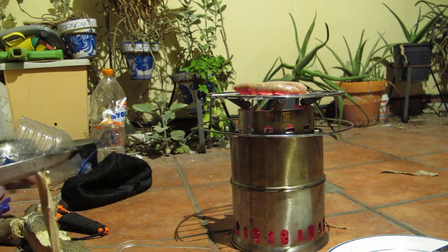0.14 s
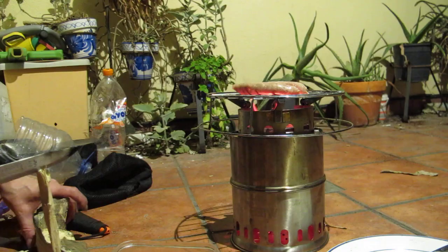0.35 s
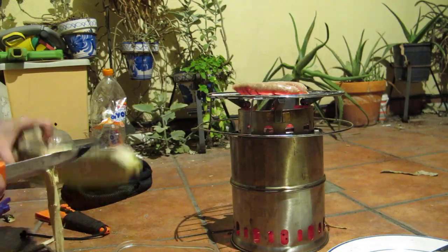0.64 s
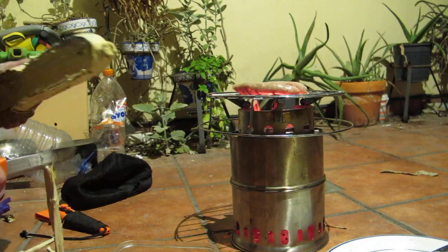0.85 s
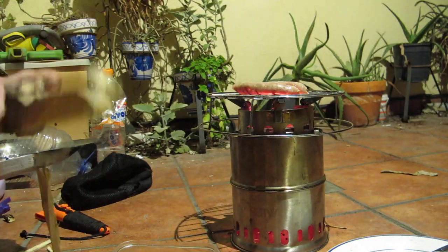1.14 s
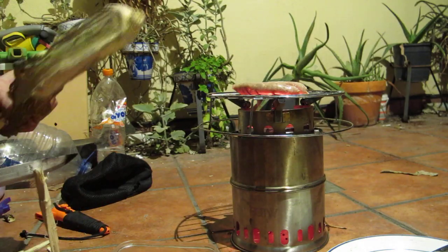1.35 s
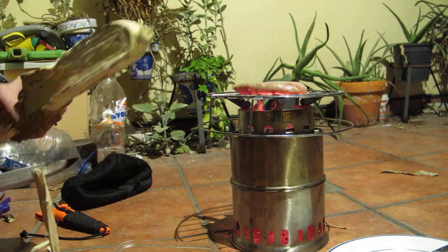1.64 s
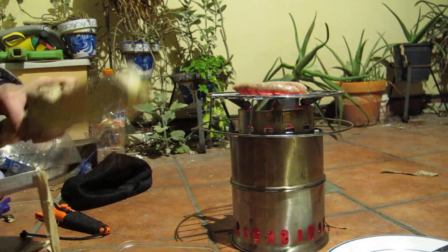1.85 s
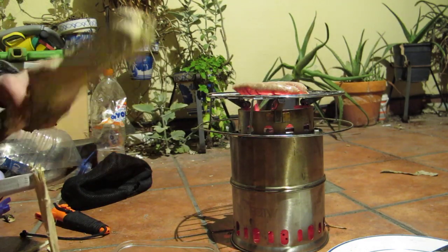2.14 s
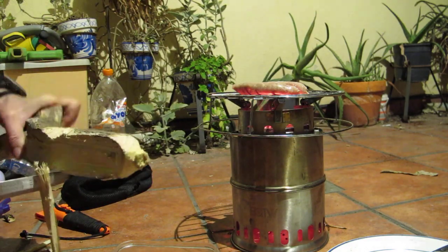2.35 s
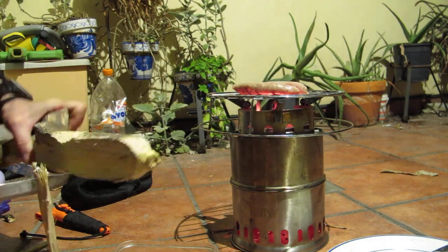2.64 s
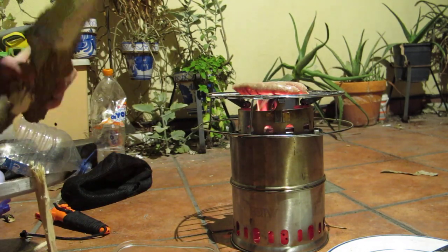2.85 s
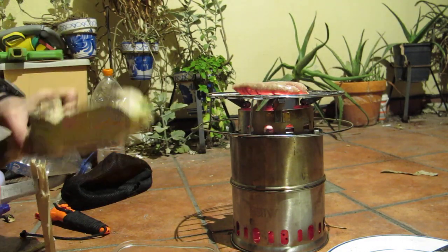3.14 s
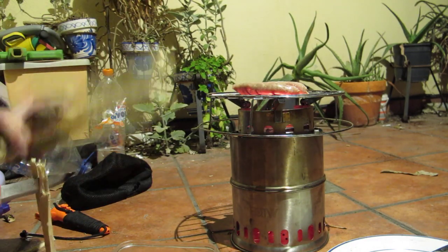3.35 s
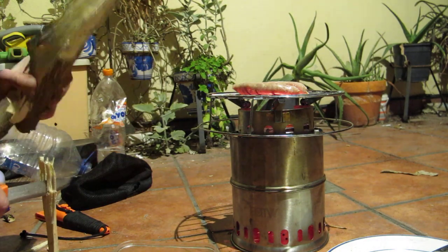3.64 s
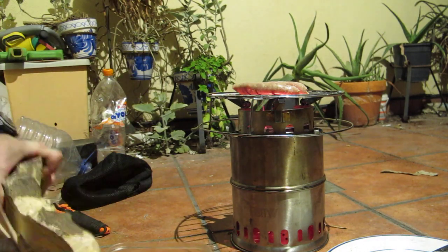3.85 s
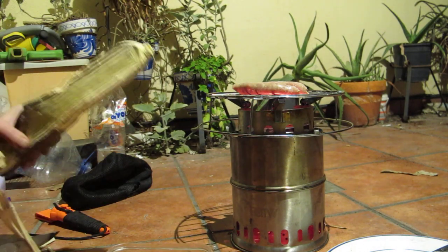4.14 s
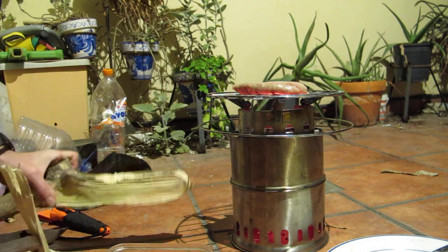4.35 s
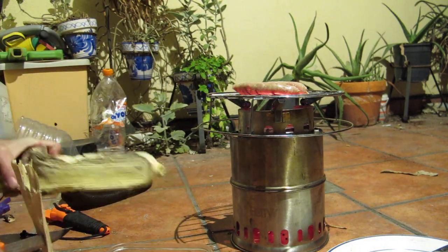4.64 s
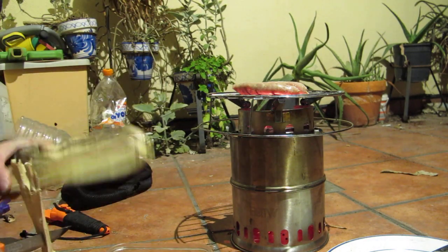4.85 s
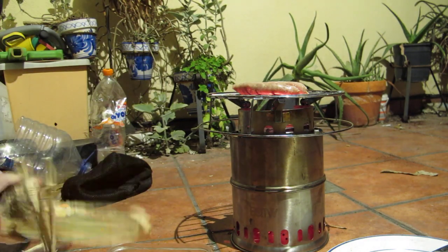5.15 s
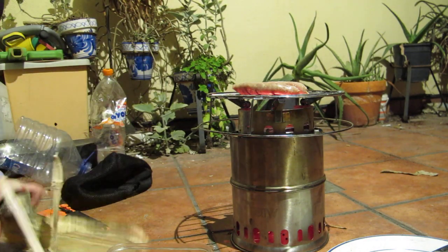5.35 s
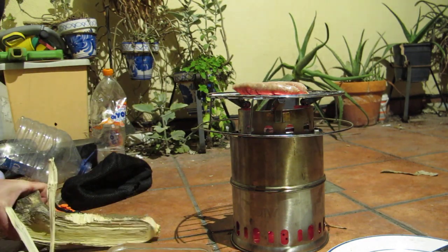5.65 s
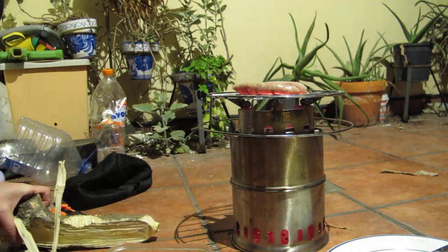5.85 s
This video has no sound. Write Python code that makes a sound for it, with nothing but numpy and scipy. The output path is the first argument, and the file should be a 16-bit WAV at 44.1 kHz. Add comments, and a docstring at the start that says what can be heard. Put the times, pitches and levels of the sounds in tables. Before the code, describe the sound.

On a small walled patio, hands rustle bark and a loose blade clinks. Two sharp blows bite the blade into wood, then a run of heavy, low thuds as the log is pounded on tiles. It splits in a rapid crackling burst, followed by one more bite and loose pieces clacking. Close stereo microphone, short hard echoes, quiet town rumble, level ducking after loud hits.

```python
"""Heavy thuds, blade clinks and a splitting crack: a log with a wedged knife is pounded on patio tiles.
Contacts are short noise bursts with a clatter; most also set decaying modes of blade or wood ringing.
Loose pieces clack; hands rustle and scrape (swelling noise bands) over a quiet town rumble.
Direct sound, one wall echo and a dense patio tail meet.
A gain control ducks after loud blows and creeps back."""
import sys
import numpy as np
from scipy import signal
from scipy.fft import rfft, irfft, next_fast_len
from scipy.io import wavfile
from scipy.ndimage import uniform_filter1d

SR = 44100
rng = np.random.default_rng(int(sys.argv[2]) if len(sys.argv) > 2 else 0)


def log_audio(samples):
    """Write samples as a 16-bit WAV file to the path given in sys.argv[1]."""
    # one column per channel
    frames = np.atleast_2d(samples).T
    # limit to full scale, then quantise
    limited = np.clip(frames, -1, 1)
    pcm = np.round(limited * 32767).astype(np.int16)
    wavfile.write(sys.argv[1], SR, pcm)


N = 264159
CONTACT_SAMPLES = 9000
FLUTTER_HZ = 60
LOOSE, RESTING = .6, .3   # share of a ring that flutters
# stereo likeness of background noise: (frequency [Hz], left-right correlation)
LIKENESS = [(60, 0.93), (240, 0.9), (950, 1), (3770, 0.022), (15000, 0.06)]
# modes of the blade held in wood: (frequency [Hz], level [dB], t60 [s])
WEDGED_BLADE = [(1463, -6, 0.29), (2384, -5.5, 0.24), (2065, -11, 0.13), (3180, -13, 0.2), (4870, -7, 0.17)]


def from_db(db):
    """Amplitude ratio of a level in dB."""
    return 10 ** (np.asarray(db) / 20)


def rms_one(x):
    """Scale to unit rms."""
    return x / np.sqrt(np.mean(x ** 2) + 1e-20)


def at_hz(points, hz):
    """Interpolate (Hz, value) points over log frequency."""
    points = np.array(points)
    return np.interp(np.log(hz), np.log(points[:, 0]), points[:, 1])


def band(x, low_hz, high_hz):
    """Band-pass x."""
    sos = signal.butter(2, [low_hz, high_hz], "band", fs=SR, output="sos")
    return signal.sosfilt(sos, x + 1e-18)


def around(x, hz, width):
    """Band-pass x in a narrow band around hz."""
    return band(x, hz / (1 + width), hz * (1 + width))


def drift(corner_hz):
    """Slow random wander of unit rms: noise through a double pole, on every 40th sample."""
    r = np.exp(-80 * np.pi * corner_hz / SR)
    white = rng.standard_normal(N // 40 + 2002)
    slow = signal.lfilter([1], [1, -2 * r, r * r], white)[2000:]   # settled part
    return np.interp(np.arange(N) / 40, np.arange(len(slow)), rms_one(slow))


def ring(push, hz, t60_s):
    """Two-pole resonator: a unit click starts a decaying sine of height about 1."""
    r = from_db(-60 / (t60_s * SR))
    w = 2 * np.pi * hz / SR
    return signal.lfilter([0, np.sin(w)], [1, -2 * r * np.cos(w), r * r], push + 1e-18)


def stereo_bands(size, likeness, gain):
    """Half-octave bands of stereo noise, each shaped by gain(hz) and correlated by likeness."""
    out = 0
    edges_hz = 22 * 2 ** np.arange(0, 9.9, .5)
    white = rng.standard_normal((2, 2, size))   # neighbouring bands take different noise
    for k, (low_hz, high_hz) in enumerate(zip(edges_hz, edges_hz[1:])):
        mid, side = band(white[k % 2], low_hz, high_hz)
        hz = np.sqrt(low_hz * high_hz)
        alike = np.clip(at_hz(likeness, hz), -1, 1)
        pair = np.sqrt(1 + alike) * mid + np.sqrt(1 - alike) * side * [[1], [-1]]
        out = out + gain(hz) * pair
    return out


def rub_swell(middle_s, half_s, edge_db=-12.5):
    """A rub swells to its middle and fades again, edge_db down half_s away."""
    return from_db(edge_db * ((np.arange(N) / SR - middle_s) / half_s) ** 2)


def hand_level(idle_db, column):
    """Power sum of an idle level and the swells of one level column of the hand rubs."""
    # hands on bark: (middle [s], half length [s], dull shuffle [dB], low scuff [dB], high rustle [dB])
    hand_rubs = [(0.01, 0.092, -41, -37.5, -37), (0.269, 0.071, -36, -28.5, -31),
                 (0.42, 0.075, -38.5, -57, -61), (0.46, 1, -45, -43, -34), (0.629, 0.17, -48, -33.5, -26),
                 (1.14, 0.29, -45, -39, -61.5), (2.194, 0.22, -47, -51, -42.5),
                 (3.755, .06, -46, -33.5, -48.5), (4.465, 0.037, -73, -49, -43),
                 (4.85, 0.075, -45, -49.5, -70), (5.22, 0.033, -61.5, -56.5, -28.5),
                 (5.724, 0.076, -64, -56, -31.5), (5.859, 0.08, -60.5, -63, -37)]
    level = from_db(idle_db)
    for rub in hand_rubs:
        level = np.hypot(level, from_db(rub[column]) * rub_swell(rub[0], rub[1]))
    return level


def rumble():
    """Far town rumble and microphone hiss: slowly gusting noise, swelled by dull shuffling nearby."""
    # spectrum: (frequency [Hz], density [dB per Hz])
    rumble_spectrum = [(20, -13), (50, 0), (115, 3), (300, -9), (510, -10), (900, -19), (1200, -18.5),
                       (3000, -27), (6000, -31.5), (15800, -37.5)]
    gust_db = 1.0 * drift(5.9)
    noise = stereo_bands(N, LIKENESS, lambda hz: from_db(at_hz(rumble_spectrum, hz) + gust_db))
    return hand_level(idle_db=-51, column=2) * rms_one(noise)


def hands():
    """Hands rub bark: low scuff and high rustle noise that wavers jointly and per band."""
    # spectrum: (frequency [Hz], density [dB per Hz])
    rustle_spectrum = [(150, 1.5), (260, -1.5), (700, 0.5), (1200, -4), (2190, -10), (2980, -9), (5810, -7),
                       (9000, -17.5), (15000, -37.5)]
    scuff = hand_level(idle_db=-62, column=3)
    rustle = hand_level(idle_db=-47, column=4)
    rub_db = 2 * drift(8.3)

    def gain(hz):
        level = scuff if hz < 1500 else rustle
        return level * from_db(at_hz(rustle_spectrum, hz) - 3.0 + rub_db + 0.64 * drift(9.2))

    return stereo_bands(N, LIKENESS, gain)


def scrapes(width=0.054, grain_db=0.0, alike=0.86):
    """Faint pitched scrapes and squeaks: noise in one narrow resonance each."""
    # (middle [s], half length [s], frequency [Hz], level [dB])
    scrape_events = [(0.034, 0.07, 510, -45.5), (0.265, 0.034, 251.4, -36), (0.268, 0.019, 1284, -32),
                     (0.725, 0.098, 2090, -50.5), (1.143, 0.04, 1680, -51), (3.763, 0.03, 712, -46.5),
                     (3.751, 0.063, 1580, -52.5)]
    mid, side = rng.standard_normal((2, N)) * from_db(grain_db * drift(30.0))
    noise = mid + (1 - alike) * side * np.array([[1], [-1]])
    out = 0
    for middle_s, half_s, hz, level_db in scrape_events:
        squeak = rms_one(around(noise, hz, width))
        out = out + from_db(level_db) * rub_swell(middle_s, half_s) * squeak
    return out


def struck(kind, s, crack_db, note_hz, weight_db=0, bright_db=0, pan_db=0):
    """Colour of a kind of contact, shifted by strength, weight and brightness of one blow."""
    # kind: thud, knock, splinter [dB re crack], clatter [dB re loudest part], pan [dB L-R],
    # contact time [ms], echo strength [dB]
    thud_db, knock_db, splinter_db, clatter_db, side_db, contact_ms, wet_db = kind
    return (s, crack_db, crack_db + thud_db + weight_db,
            crack_db + knock_db + 0.54 * weight_db,   # the knock follows weight in part
            crack_db + splinter_db + bright_db,
            note_hz, clatter_db, side_db + pan_db, contact_ms, wet_db)


def contact(row, lead_ms=1.3, clatter_ms=10.0, clatter_width=0.078):
    """One blow: a four-part burst of a few ms, then the rough clatter of the struck spot."""
    # bands of crack, thud, knock, splinter: (low edge [Hz], high edge [Hz])
    parts_hz = [(1430, 4590), (97, 354), (500, 1300), (5040, 8320)]
    s, *parts_db, note_hz, clatter_db, pan_db, contact_ms, wet_db = row
    t_ms = np.arange(CONTACT_SAMPLES) / SR * 1000
    fade = np.exp(-t_ms / np.clip(contact_ms, .3, 8)) * np.minimum(t_ms / 0.26, 1)
    grit = rng.standard_normal((5, CONTACT_SAMPLES))
    clatter = around(grit[4] * np.exp(-t_ms / clatter_ms), note_hz, clatter_width)
    grit *= fade
    grit[1] = fade * np.sin(np.minimum(t_ms / 2.1, 2) * np.pi)   # thud: one push and rebound
    heard = [band(g, low, high) for g, (low, high) in zip(grit, parts_hz)] + [clatter]
    levels = from_db(parts_db + [max(parts_db) + clatter_db])
    parts = [level * h / np.abs(h).max() for level, h in zip(levels, heard)]
    crack, thud, knock, splinter, clatter = parts
    sides = from_db(np.array([[.5], [-.5]]) * pan_db)   # lows arrive centred
    direct = thud + knock + sides * (crack + splinter + clatter)

    # walls and modes get an even click of the same colour and energy
    click = t_ms == 0
    even = 0
    for sign, (low, high), part in zip([1, 1, -1, -1], parts_hz, parts):   # neighbours meet in phase
        even = even + sign * rms_one(band(click, low, high)) * np.std(part)
    # modes near the struck spot ring most
    spot = rms_one(around(click, note_hz, clatter_width)) * np.std(clatter)
    sent = from_db(wet_db) * np.array([even + clatter, even + spot])
    return round((s + lead_ms / 1000) * SR), np.vstack([direct, sent])


def blows(events, modes=(), ring_db=0, flutter=0):
    """Rows left, right, all-round and push; the push rings the modes, a looser body flutters more."""
    out = np.zeros((4, N + CONTACT_SAMPLES + 100))
    for at, sound in map(contact, events):
        out[:, at:at + CONTACT_SAMPLES] += sound
    out = out[:, :N]
    push = out[3].copy()
    for hz, level_db, t60_s in modes:
        wobble = 1 - flutter + flutter * drift(FLUTTER_HZ)
        out += from_db(level_db + ring_db) * hz / SR * ring(push, hz, t60_s) * wobble
    return out


def ticks():
    """Small ticks of fingers and chips, and faint pitched pings: contacts without modes."""
    # kinds of contact: columns as in struck()
    tick_kind = (-18, -17, -2.5, -17.5, 4, 4, 5.5)
    ping_kind = (-23.5, -20.5, -6.5, 2.5, -1, 5, -11.5)
    # ticks: (time [s], crack [dB], brightness [dB], pan [dB L-R])
    tick_events = [(0.307, -47, 17.5, 10), (0.328, -27, 4.5, -3), (0.478, -25.5, 1, -1),
                   (0.5348, -42.5, 18, 1), (0.574, -35.5, 18.5, 4), (1.344, -25, -15.5, -9),
                   (1.4455, -49.5, 17, -1), (2.8808, -32, 11, -8.5), (3.3713, -40, 2.5, -16),
                   (5.249, -45, 20.5, 12), (5.262, -54, 18.5, 2)]
    # pings: (time [s], crack [dB], clatter [Hz])
    ping_events = [(2.134, -35.5, 3850), (2.197, -44, 2140), (2.489, -41, 2480)]
    events = [struck(tick_kind, s, db, 6018, bright_db=bright_db, pan_db=pan_db)
              for s, db, bright_db, pan_db in tick_events]
    events += [struck(ping_kind, s, db, hz) for s, db, hz in ping_events]
    return blows(events)


def clacks():
    """Split pieces knocked about: heavy, knocking contacts ring short wood modes."""
    # kind of contact: columns as in struck()
    clack_kind = (-1.5, 7.5, 3.5, -9, -3, 1.5, 6)
    # (time [s], crack [dB], weight [dB], brightness [dB], clatter [Hz])
    clack_events = [(5.184, -23, -1.5, 1, 786), (5.2421, -46.5, 14, 0, 1240), (5.4045, 2, -7, -12.5, 1382),
                    (5.6412, -42, 22, -12, 580), (5.8404, -38.5, 18, -2.5, 1430),
                    (5.8701, -51.5, 28.5, -8.5, 539)]
    # modes of the pieces: (frequency [Hz], level [dB], t60 [s])
    piece_modes = [(326.5, 4.5, 0.088), (525, -9.5, 0.39), (767, -2, 0.16), (1210, -8, 0.14),
                   (1430, -2.5, 0.24), (2330, -5.5, 0.085)]
    events = [struck(clack_kind, s, db, hz, weight_db, bright_db)
              for s, db, weight_db, bright_db, hz in clack_events]
    return blows(events, piece_modes, ring_db=-9.5, flutter=RESTING)


def clinks():
    """The loose blade clinks: its modes ring with a strong flutter."""
    # kind of contact: columns as in struck()
    clink_kind = (-20.5, -16, -16, -7, -3, 2.5, 6.5)
    # (time [s], crack [dB], clatter [Hz])
    clink_events = [(0.3407, -9.5, 1835), (0.4445, -19, 1830)]
    # modes of the loose blade: (frequency [Hz], level [dB], t60 [s])
    loose_blade = [(930, -7.5, 0.39), (1660, -13, 0.13), (1900, -1.5, 0.06), (2018, 4, 0.13),
                   (2880, -1.5, 0.077)]
    events = [struck(clink_kind, s, db, hz) for s, db, hz in clink_events]
    return blows(events, loose_blade, ring_db=-8.5, flutter=LOOSE)


def bites():
    """The blade bites into wood: a strong crack rings the wedged blade."""
    # kind of contact: columns as in struck()
    bite_kind = (-25.5, -18, -16, -19.5, 1.5, 2, 0)
    # (time [s], crack [dB], weight [dB], brightness [dB], clatter [Hz])
    bite_events = [(1.2011, 10, -3.5, -7.5, 1990), (1.497, 5, 3, 6.5, 4560), (3.8045, 8, 12.5, 1.5, 2360),
                   (4.94, -1.5, 7, -18.5, 2480)]
    events = [struck(bite_kind, s, db, hz, weight_db, bright_db)
              for s, db, weight_db, bright_db, hz in bite_events]
    return blows(events, WEDGED_BLADE, ring_db=-20.5, flutter=LOOSE)


def splits():
    """The log cracks apart: a quick run of contacts rings the two halves."""
    # kind of contact: columns as in struck()
    split_kind = (-24, -2.5, -10, -8.5, 2.5, 3.5, 4.5)
    # (time [s], crack [dB], weight [dB], brightness [dB], clatter [Hz])
    split_events = [(3.819, -2.5, -11.5, 12.5, 903), (3.8283, 12.5, 2.5, 6, 990),
                    (3.837, 0, 12, -3.5, 1259), (3.854, 2.5, 9.5, -2.5, 938), (3.875, 5, 8.5, 3.5, 817),
                    (3.911, 0.5, 3.5, -0.5, 948), (3.921, -5.5, 2.5, 6, 1098)]
    # modes of the halves: (frequency [Hz], level [dB], t60 [s])
    half_modes = [(756, -22, 0.69), (981, 1, 0.14), (1027.2, -27.5, 1), (1200, -6, 0.1), (1416, -6, 0.18),
                  (1710, -11.5, 0.043), (2250, -15, 0.16)]
    events = [struck(split_kind, s, db, hz, weight_db, bright_db)
              for s, db, weight_db, bright_db, hz in split_events]
    return blows(events, half_modes, ring_db=-10.5, flutter=LOOSE)


def pounds():
    """Log on tiles: heavy contacts ring the log's low modes, and faintly the blade wedged in it."""
    # kind of contact: columns as in struck()
    pound_kind = (-5.5, -3, -2, -15.5, -0.5, 2.5, 2)
    # (time [s], crack [dB], weight [dB], brightness [dB])
    pound_events = [(1.7613, -12.5, 0.5, -4), (1.773, -23.5, -1, 5), (2.0207, -3.5, 0.5, 1),
                    (2.03, -13.5, 6, -2), (2.058, -24.5, 0, -5), (2.3185, 1, 0, -0.5), (2.63, -1, 5, 9.5),
                    (3.038, 1.5, -2.5, 6), (3.05, -14.5, 6.5, -1), (3.067, -19, 10, -10),
                    (3.4135, 4, -2, -2)]
    # modes of the log: (frequency [Hz], level [dB], t60 [s])
    log_modes = [(67.5, 9, 0.54), (163.4, 7, 0.17), (264, -6.5, 0.19), (347, 2, 0.076), (533, -0.5, 0.06),
                 (596, -2.5, 0.14)]
    shaken_blade = [(hz, db - 22.5, t60_s) for hz, db, t60_s in WEDGED_BLADE]
    events = [struck(pound_kind, s, db, 2250, weight_db, bright_db)
              for s, db, weight_db, bright_db in pound_events]
    return blows(events, log_modes + shaken_blade, ring_db=-2.0, flutter=RESTING)


def ports(x):
    """The housing shades and delays direct sound differently at the two microphone ports."""
    # (frequency [Hz], left lead [rad])
    port_phase = [(3000, .1), (8000, -1.3), (10000, 1.0), (13000, 1.3)]
    # (frequency [Hz], left-right balance [dB])
    port_balance = [(1000, 1), (5000, 9.5), (9500, -11.5), (15000, -0.5)]
    size = next_fast_len(N)
    hz = np.maximum(np.arange(size // 2 + 1) * SR / size, 1)
    half = from_db(at_hz(port_balance, hz) / 2) * np.exp(.5j * at_hz(port_phase, hz))
    return irfft(rfft(x, size) * [half, 1 / half], size)[:, :N]


def wall_echo(direct, lag_ms=13, echo_db=-22):
    """The wall behind the plants returns the direct sound once, sides swapped."""
    lag = round(lag_ms / 1000 * SR)
    out = direct.copy()
    out[:, lag:] += from_db(echo_db) * direct[::-1, :-lag]
    return out


def patio(x, first_ms=5.7, build_ms=2.0, far_db=-27.0, far_stretch=3.72):
    """Walls and tiles answer with a dense tail, longest in the lows; far walls add a faint longer one."""
    # decay: (frequency [Hz], t60 [s])
    patio_t60 = [(80, 0.37), (250, 0.25), (700, 0.16), (2000, 0.2), (5000, 0.15), (12000, 0.21)]
    # (frequency [Hz], left-right correlation)
    patio_likeness = [(100, 0.99), (600, 0.95), (2000, 0.25), (8000, 0.6)]
    t = np.arange(SR * 3 // 4) / SR

    def decay(hz):
        fall_db = -60 * t / at_hz(patio_t60, hz)
        return from_db(fall_db) + from_db(far_db + fall_db / far_stretch)

    tail = stereo_bands(len(t), patio_likeness, decay)
    tail *= np.clip((t * 1000 - first_ms) / build_ms, 0, 1)
    tail /= np.sqrt(np.sum(tail ** 2) / 2)
    return signal.fftconvolve(x.mean(axis=0)[None], tail, axes=1)[:, :N]


def gain_control(x, limit_db=-14, pull_per_ms=0.1, creep_db_per_s=9, listen_ms=6.3, lag_ms=8.3):
    """About each ms, excess over the limit pulls the gain down; it creeps back up to full."""
    step = SR // 1000
    power = uniform_filter1d(np.mean(x ** 2, axis=0), round(listen_ms * step))[::step]
    gain_db, now_db = [], 0.
    for level_db in 10 * np.log10(np.maximum(power, 0) + 1e-12):
        over_db = max(level_db + now_db - limit_db, 0)
        now_db = min(now_db - pull_per_ms * over_db + creep_db_per_s / 1000, 0)
        gain_db.append(now_db)
    r = np.exp(-1 / lag_ms)
    gain_db = signal.lfilter([0, 1 - r], [1, -r], gain_db)
    return x * from_db(np.interp(np.arange(N) / step, np.arange(len(gain_db)), gain_db))


def scene():
    """Sum direct blows, wall echo, patio tail, rumble, hands and scrapes."""
    hits = ticks() + clacks() + clinks() + bites() + splits() + pounds()
    direct = wall_echo(ports(hits[:2]))
    tail = from_db(-9.0) * patio(hits[2:3])
    return direct + tail + rumble() + hands() + scrapes()


def record(dry):
    """The housing hollows the upper middle, the gain ducks, peaks overload softly, the top is cut."""
    dip_hz, dip_width_hz, dip_depth, cutoff_hz = 4000, 1000, 0.28, 15900
    peak = signal.iirpeak(dip_hz, dip_hz / dip_width_hz, fs=SR)
    coloured = dry - dip_depth * signal.lfilter(*peak, dry)
    overloaded = 1.016 * np.tanh(gain_control(coloured) / 1.397)
    low_pass = signal.cheby2(12, 60, cutoff_hz, fs=SR, output="sos")
    return signal.sosfilt(low_pass, overloaded)


dry = scene()
out = record(dry)
log_audio(out)
```